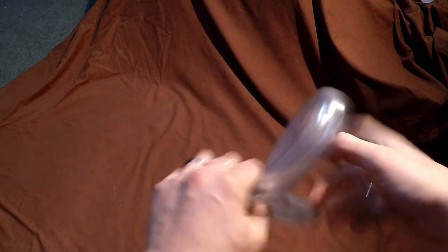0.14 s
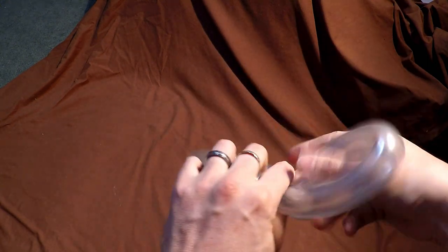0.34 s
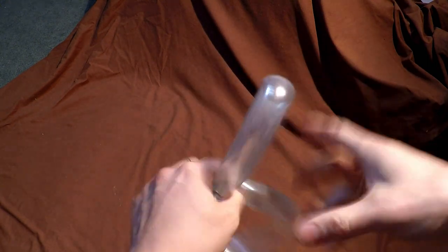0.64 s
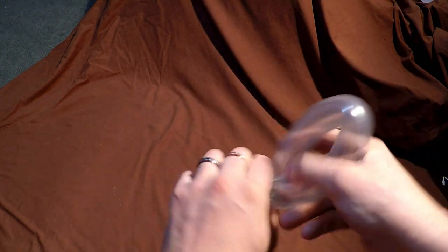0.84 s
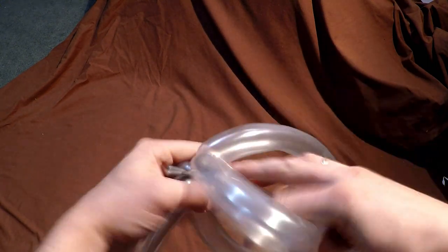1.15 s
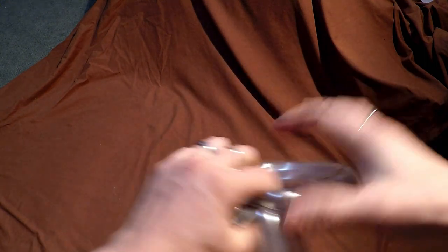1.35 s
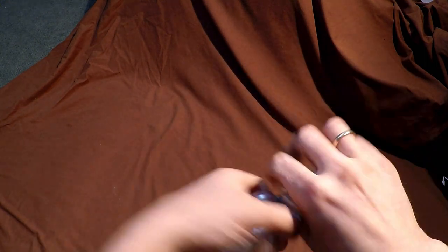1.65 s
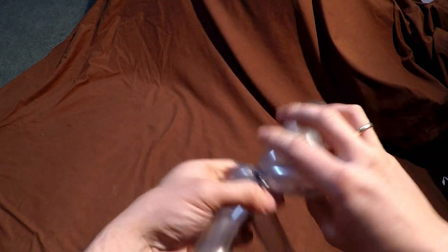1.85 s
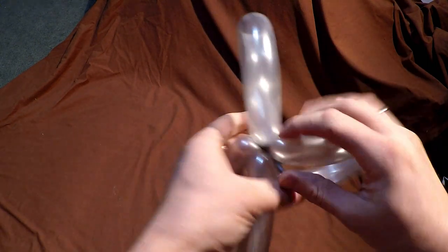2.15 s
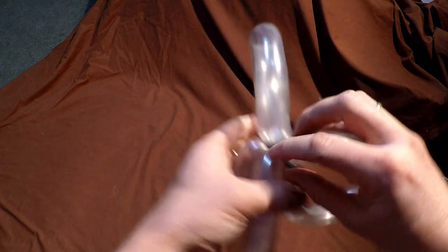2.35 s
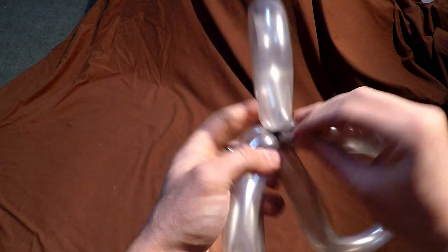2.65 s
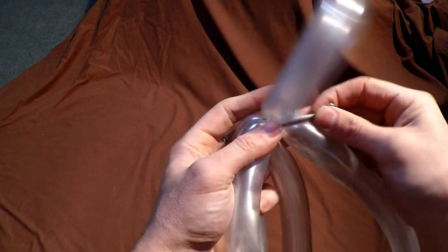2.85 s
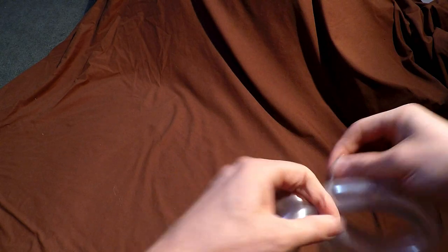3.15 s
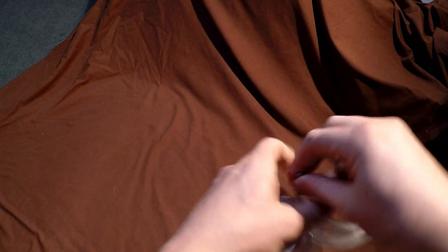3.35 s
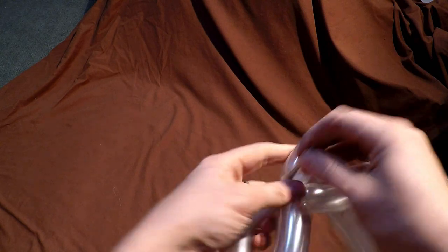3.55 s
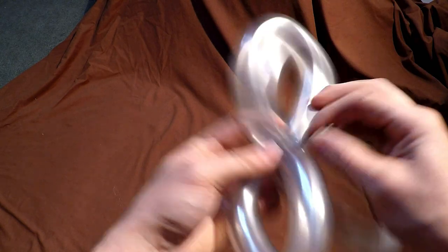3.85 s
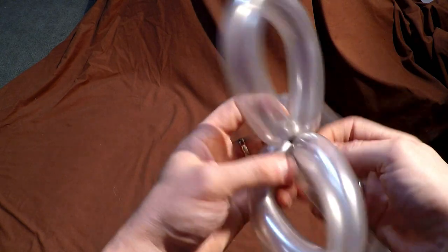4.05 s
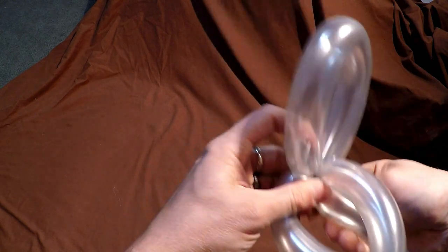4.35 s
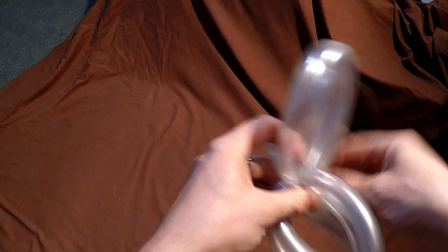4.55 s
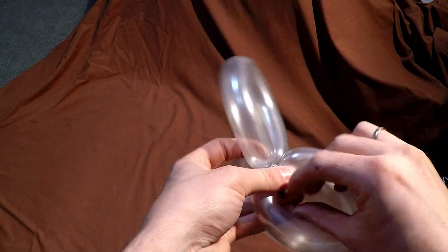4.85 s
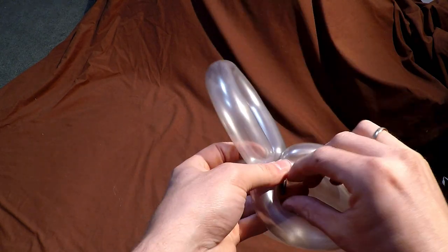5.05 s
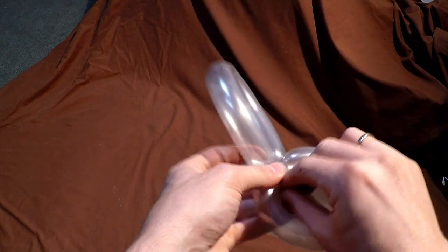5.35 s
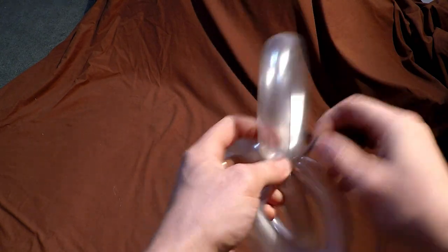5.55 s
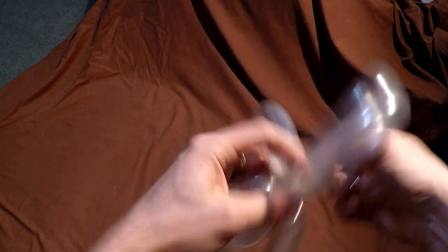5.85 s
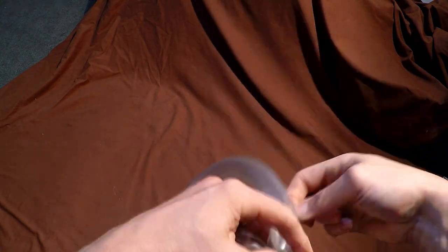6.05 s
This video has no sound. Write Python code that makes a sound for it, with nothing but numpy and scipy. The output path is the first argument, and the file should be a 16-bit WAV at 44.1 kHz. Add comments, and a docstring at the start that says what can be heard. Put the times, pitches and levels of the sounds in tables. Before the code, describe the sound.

Close up in a small room, dry fingertips slide over a long inflated balloon in uneven strokes, now and then knocking softly on the hollow tube. As the twists tighten, latex catches and slips on latex, giving ringing snaps and quick creaking, squeaky runs. These grow denser and peak in a loud crackling creak shortly before the end. A low handling rumble and faint still air lie underneath.

```python
"""A small room, close up: two hands fold and twist an inflated latex modelling balloon.
Fingers rub and crackle over the skin with a low handling rumble, and now and then bump the air-filled tube.
Latex sticks and slips on latex: each slip snaps the taut skin and rings round the tube,
and quick runs of slips creak and squeak. The walls add a short tail over faint still air."""
import sys
import numpy as np
from scipy import signal
from scipy.fft import rfft, irfft, next_fast_len
from scipy.io import wavfile
from scipy.ndimage import map_coordinates

SR = 44100
rng = np.random.default_rng(int(sys.argv[2]) if len(sys.argv) > 2 else 0)


def transcribe(u):
    """Save the signal u as a 16-bit wav file named by the first command-line argument.

    u: samples, shape (n,) or (channels, n), limited to [-1, 1]; the rate is SR.
    q: integer samples, one column per channel.
    """
    v = np.clip(np.atleast_2d(u).T, -1, 1)
    q = np.round(v * 32767).astype(np.int16)
    wavfile.write(sys.argv[1], SR, q)


N = 273665
SLIP_SAMPLES = 2048


def amp(db):
    """Decibels to gain."""
    return 10 ** (np.asarray(db) / 20)


def unit(x):
    """Scale to rms 1."""
    return x / np.sqrt(np.mean(x ** 2) + 1e-20)


def over_time(points):
    """(time_s, value) points, read at every sample."""
    return np.interp(np.arange(N) / SR, *np.transpose(points))


def over_freq(points, hz):
    """(freq_hz, value) points, read on a log axis."""
    freqs_hz, values = np.transpose(points)
    return np.interp(np.log(hz + 1), np.log(freqs_hz), values)


def minimum_phase(gain):
    """Causal response with this magnitude."""
    cepstrum = irfft(np.log(np.maximum(gain, 1e-6)))
    half = len(cepstrum) // 2
    return np.exp(rfft(cepstrum * np.r_[1, np.full(half - 1, 2), 1, np.zeros(half - 1)]))


def coloured(x, spectrum):
    """x through a causal filter of (freq_hz, gain_db) points, rms 1."""
    gain = amp(over_freq(spectrum, np.fft.rfftfreq(8192, 1 / SR)))
    return unit(signal.fftconvolve(x, irfft(minimum_phase(gain)))[:N])


def add(track, start_s, sound):
    """Mix a sound into the track."""
    part = track[..., max(round(start_s * SR), 0):][..., :sound.shape[-1]]
    part += sound[..., :part.shape[-1]]


def friction(slips_per_s, spread_db):
    """Tiny slips of unequal size at random times, rms 1."""
    sizes = amp(spread_db * np.minimum(rng.exponential(size=N), 4))
    signs = rng.choice([-1, 1], N)
    return unit(sizes * signs * (rng.random(N) < slips_per_s / SR))


def surges(fade_s=0.0028, depth=0.52):
    """Gain of a finger that catches and lets go: each release starts at once and dies away."""
    releases = friction(slips_per_s=110, spread_db=2.5) ** 2
    power = signal.lfilter([1], [1, -np.exp(-1 / (fade_s * SR))], releases)
    return np.sqrt(1 - depth + depth * power / power.mean())


# Slow creep of the hands: time_s, level_db
HAND_CREEP = [(0, -43.5), (1, -45), (3, -40.5), (4.5, -41), (6.2, -41)]
# Hands letting go: start_s, end_s, creep_drop_db
HAND_PAUSES = [(0.594, 0.765, 6.5), (1.306, 1.43, 14), (2.57, 2.61, 10), (3.35, 3.395, 5)]
# Finger strokes: start_s, end_s, level_db, relative_hiss_db, patch_hz
FINGER_STROKES = [(0, 0.033, -35, -11.5, 790), (0.13, 0.263, -37, -8, 700), (0.26, 0.435, -39, -11, 1410),
                  (0.501, 0.571, -34.5, -6, 4600), (0.584, 0.616, -41.5, 0, 4650),
                  (.76, 0.85, -61, 9.5, 4320), (0.897, 1.107, -32, -8.5, 1270),
                  (1.1, 1.227, -39.5, -3, 4350), (1.43, 1.471, -30, -13, 696),
                  (1.483, 1.532, -38.5, -7, 2860), (1.52, 1.75, -34, -11.5, 1360),
                  (1.759, 1.852, -33, -14, 1500), (1.852, 2.012, -38, -11.5, 1200),
                  (2.023, 2.254, -39.5, -11, 1520), (2.378, 2.583, -37, -17, 1430),
                  (2.64, 2.722, -32.5, -8, 3360), (2.715, 3.09, -40.5, -5, 2460),
                  (3.077, 3.196, -37.5, -13, 1930), (3.175, 3.235, -31.5, -5, 3200),
                  (3.27, 3.325, -52, 4, 3600), (3.39, 3.495, -34.5, -11, 3250),
                  (3.492, 3.573, -32.5, -10.5, 3400), (3.576, 3.637, -23.5, -16, 2300),
                  (3.73, 3.785, -32, -16, 3100), (3.853, 4.134, -29.5, -17, 1800),
                  (4.151, 4.223, -31, -18, 2420), (4.319, 4.453, -30, -14, 1000),
                  (4.48, 4.587, -38.5, -7, 860), (4.6, 4.728, -56, 6, 2500), (4.75, 4.899, -33, -15, 2400),
                  (4.897, 5.07, -35, -13.5, 900), (5.132, 5.256, -33.5, -17, 864),
                  (5.255, 5.365, -30, -12, 3000), (5.425, 5.575, -41.5, -12, 1000),
                  (5.588, 5.625, -33.5, -6, 4700), (5.679, 5.736, -26, -11, 1640),
                  (5.835, 5.889, -31, -15, 2040), (5.916, 6.045, -36.5, -7, 2900),
                  (6.15, 6.227, -33, -9.5, 2150)]


def sliding(attack_s=0.027, release_s=0.014, swell_db=5, let_go_s=0.028, take_hold_s=0.0047):
    """Rub and hiss gains: each stroke sets in, swells and dies away over the creep of the hands."""
    t = np.arange(N) / SR
    creep_db = over_time(HAND_CREEP)
    for start_s, end_s, drop_db in HAND_PAUSES:
        lifted = np.minimum((t - start_s) / let_go_s, (end_s - t) / take_hold_s)
        creep_db -= drop_db * np.clip(lifted, 0, 1)
    rub_power, hiss_power = amp(creep_db) ** 2, amp(creep_db - 10) ** 2
    for start_s, end_s, level_db, hiss_db, _ in FINGER_STROKES:
        length_s = max(end_s - start_s, attack_s)
        age_s = np.arange(int(length_s * SR) + SR // 4) / SR
        arch = np.sin(np.pi * np.minimum(age_s / length_s, 1)) - 1
        attack = np.minimum(age_s / attack_s, 1)
        release = np.exp(-np.maximum(age_s - length_s, 0) / release_s)
        gain = amp(level_db + swell_db * arch) * attack * release
        add(rub_power, start_s - attack_s / 2, gain ** 2)
        add(hiss_power, start_s - attack_s / 2, (gain * amp(hiss_db)) ** 2)
    return np.sqrt(rub_power), np.sqrt(hiss_power)


def touched_patch(x, boost_db=5, width_octaves=0.8):
    """The skin under the fingers adds a broad resonance that moves from stroke to stroke."""
    start_s, end_s, *_, patch_hz = np.transpose(FINGER_STROKES)
    hz, t, bins = signal.stft(x, SR, nperseg=256)
    centre_hz = np.interp(t, (start_s + end_s) / 2, patch_hz)
    distance = np.log2((hz[:, None] + 1) / centre_hz) / width_octaves
    boost = amp(boost_db * np.exp(-distance ** 2))
    return unit(signal.istft(bins * boost, SR, nperseg=256)[1][:N])


# Rubbed latex: freq_hz, gain_db
SKIN_SPECTRUM = [(400, -37), (700, 0.5), (1200, 0), (1700, 2.5), (2600, 1.5), (4800, 4), (7000, -10.5),
                 (9500, -48), (15000, -120)]
# Dry fingertips: freq_hz, gain_db
HISS_SPECTRUM = [(3240, -6), (5500, -14.5), (7550, -3.5), (13400, -12), (14700, -11.5), (15500, -29)]
# Hollow tube: freq_hz, gain_db
TUBE_SPECTRUM = [(94, -34), (160, -3.5), (300, -4), (421, 2), (575, -0.5), (669, -1.5), (900, -12),
                 (1170, 4.5), (1980, -120)]


def rubbing(rub_gain, hiss_gain, skin_smooth=0.55, hiss_smooth=0.71):
    """The same tiny slips drive skin, hiss and tube; latex catches in grains, fingertips hiss evenly."""
    grains = friction(slips_per_s=520, spread_db=0.5)
    slide = rng.standard_normal(N)
    flutter = surges()
    skin_drive, hiss_drive = [flutter * (np.sqrt(1 - smooth) * grains + np.sqrt(smooth) * slide)
                              for smooth in (skin_smooth, hiss_smooth)]
    skin = amp(-1) * touched_patch(coloured(skin_drive, SKIN_SPECTRUM))
    hiss = amp(-1) * coloured(hiss_drive, HISS_SPECTRUM)
    tube = amp(-8) * coloured(skin_drive, TUBE_SPECTRUM)
    return rub_gain * (skin + tube) + hiss_gain * hiss


# Handling strength: time_s, level_db
RUMBLE_LEVELS = [(0.0, -50), (0.38, -60), (1.66, -51.5), (1.97, -65), (2.19, -56), (2.62, -57),
                 (3.0, -48.5), (3.4, -52), (3.9, -44), (4.02, -42), (4.68, -50), (4.99, -61.5), (5.53, -50),
                 (6.2, -58)]
# Handling noise: freq_hz, gain_db
RUMBLE_SPECTRUM = [(12, -41), (20, -3), (70, 3), (167, -3.5), (200, -28), (260, -39), (440, -120)]


def handling_rumble(gain_db=2, lump_db=2, lumps_per_s=17):
    """Handling the balloon makes a low, lumpy rumble."""
    knots = rng.standard_normal(int(N * lumps_per_s / SR) + 4)
    lumps = map_coordinates(knots, [np.arange(N) * lumps_per_s / SR])
    level_db = over_time(RUMBLE_LEVELS) + gain_db + lump_db * lumps
    return amp(level_db) * coloured(rng.standard_normal(N), RUMBLE_SPECTRUM)


# Room background: freq_hz, gain_db
AIR_SPECTRUM = [(15, -36), (25, 7), (115, -9), (219, -20), (1240, 12.5), (1350, -4), (3010, -18),
                (4150, -9), (15000, -68)]


def still_air(level_db=-60):
    """Faint steady noise of the room."""
    return amp(level_db) * coloured(rng.standard_normal(N), AIR_SPECTRUM)


def slip(noise, note_hz, edge_hz, fizz_db, ring_share, ring_hz):
    """One release of stuck latex. Rows: the snap, and its waves ringing round the tube."""
    t = np.arange(SLIP_SAMPLES) / SR
    hz = np.fft.rfftfreq(SLIP_SAMPLES, 1 / SR) + 1
    ratio = hz / note_hz
    highpass = np.abs(ratio ** 2 / (1 - ratio ** 2 + 1j * ratio / 0.92))
    skin_power = (highpass ** 6 + amp(-21) ** 2) / np.sqrt(np.maximum(ratio, 1))
    skin_power /= 1 + (hz / edge_hz) ** 8
    fizz_power = amp(fizz_db) ** 2 / (1 + (3000 / hz) ** 2) / (1 + (hz / 13000) ** 4)
    # air loads the skin: low waves arrive late
    delay_s = 0.00043 / (1 + ratio ** 2)
    dispersion = np.exp(-2j * np.pi * np.cumsum(delay_s) * SR / SLIP_SAMPLES)
    response = minimum_phase(np.sqrt(skin_power + fizz_power)) * dispersion
    echoes = noise * amp(-60 * t / 0.0082) * (t > 0.0003)
    scatter = unit(irfft(response * rfft(echoes)))
    # one resonance of the squeezed bubble stands out; a loose grip lets it last
    share = np.clip(ring_share, 0.05, 1)
    fade = amp(-60 * t / (share * 0.036)) * (1 - np.exp(-t / 0.00047))
    tone = unit(np.sin(2 * np.pi * (ring_hz * t + noise[0])) * fade)
    snap = np.sqrt(1 - share) * unit(irfft(response))
    ring = np.sqrt(share) * unit(scatter + amp(-1) * tone)
    return np.array([snap, ring]) * np.sqrt(0.004 * SR / SLIP_SAMPLES)  # energy of 4 ms at rms 1


# Faint slips, denser as the twists tighten: time_s, slips_per_s
TICK_DENSITY = [(0, 10), (2.2, 12), (2.6, 25.2), (4.9, 28), (6.2, 13.2)]


def ticks(rub_gain, above_rub_db=2, spread_db=2.5, pitch_spread=0.337):
    """Faint slips fall at random, their strength following the rubbing."""
    track = np.zeros((2, N))
    for i in np.flatnonzero(rng.random(N) < over_time(TICK_DENSITY) / SR):
        noise = rng.standard_normal(SLIP_SAMPLES)
        note_hz, ring_hz = np.exp(pitch_spread * noise[-2:]) * [850, 2200]
        gain = rub_gain[i] * amp(above_rub_db + spread_db * np.tanh(noise[-3]))
        tick = slip(noise, note_hz, edge_hz=5600, fizz_db=-22, ring_share=0.38, ring_hz=ring_hz)
        add(track, i / SR, gain * tick)
    return track


# Soft knocks on the tube: start_s, peak_db, pitch_hz, decay_s
TUBE_BUMPS = [(.143, -23, 372, 0.027), (.182, -20, 420, 0.061), (.19, -28, 110, 0.071),
              (.525, -30.5, 110, 0.044), (.622, -37, 64.6, 0.093), (0.754, -23.5, 435, 0.026),
              (.762, -31.5, 241, 0.14), (1.212, -29, 170, 0.025), (1.233, -31.5, 90, .058),
              (1.4121, -23.5, 270, 0.038), (1.429, -22, 760, 0.018), (1.438, -28, 70, 0.039),
              (1.454, -17, 193, 0.033), (1.789, -24, 508, .14), (2.079, -34, 108, 0.16),
              (2.419, -28, 189, 0.1), (2.96, -30, 170, .1), (3.041, -13.5, 90, 0.025),
              (3.046, -15.5, 340, 0.043), (3.049, -26, 55, 0.058), (3.392, -18, 510, 0.051),
              (3.873, -22, 102, 0.088), (4.525, -23, 720, 0.019), (4.677, -28, 109, .051),
              (5.859, -32, 109, 0.066), (5.996, -20, 323, 0.012), (6.012, -20, 42, 0.042)]


def bumps(rise_s=0.00035, flutter_db=-6, swing_damping=1.46, flutter_damping=0.59):
    """A finger pushes the tube: a low swing that dies away quickly and a hollow flutter around the same pitch
    that lingers longer."""
    track, t = np.zeros(N), np.arange(SR // 4) / SR
    hz = np.fft.rfftfreq(len(t), 1 / SR)
    for start_s, peak_db, pitch_hz, decay_s in TUBE_BUMPS:
        ratio = hz / pitch_hz
        band = rfft(rng.standard_normal(len(t))) * ratio / (1 + ratio ** 3)
        fall_db = -60 * t / decay_s
        flutter = unit(irfft(band, len(t))) * amp(flutter_db + flutter_damping * fall_db)
        swing = np.sin(2 * np.pi * pitch_hz * t) * amp(swing_damping * fall_db)
        knock = (swing + flutter) * (1 - np.exp(-t / rise_s))
        add(track, start_s, amp(peak_db) * knock / np.abs(knock).max())
    return track


# Quick runs of slips: start_s, end_s, slips_per_s, level_db, note_hz, edge_hz, ring_share
CREAK_RUNS = [(0.261, 0.428, 105, -36, 1240, 1850, 0.46), (1.224, 1.304, 57, -43, 2750, 4700, .05),
              (2.777, 2.857, 99, -38, 900, 6100, 0.06), (3.5725, 3.589, 390, -24.5, 1140, 4630, 0.33),
              (3.589, 3.616, 550, -24, 1430, 4900, 0.04), (4.79, 4.91, 110, -33.5, 740, 6640, 0.25),
              (4.9034, 4.982, 54, -30.5, 630, 6800, 0.1), (5.009, 5.07, 167, -29.5, 656, 6600, 0.44),
              (5.091, 5.146, 132, -37.5, 780, 6160, 0.44), (5.151, 5.25, 110, -33, 700, 6200, .3),
              (5.456, 5.465, 350, -35.5, 710, 1050, 1), (5.512, 5.537, 760, -35, 1520, 4440, 0),
              (5.528, 5.554, 710, -37, 626, 4000, 0.17), (5.554, 5.57, 860, -40, 1390, 3600, 0.5),
              (5.849, 5.87, 235, -30, 1200, 5200, 0.1), (5.912, 5.921, 390, -33, 1520, 2340, 1),
              (6.176, 6.196, 290, -32.5, 1170, 4330, 0.3)]


def creaks(spread_db=1.5, fizz_db=-33, jitter=0.16):
    """Under steady pull the latex catches and lets go over and over; the fastest runs squeak."""
    track = np.zeros((2, N))
    for start_s, end_s, slips_per_s, level_db, note_hz, edge_hz, ring_share in CREAK_RUNS:
        waits, sizes = rng.standard_normal((2, 48))
        # one contact spot: all slips of a run ring alike
        noise = rng.standard_normal(SLIP_SAMPLES)
        snap = slip(noise, note_hz, edge_hz, fizz_db, ring_share, ring_hz=1.2 * note_hz)
        time_s = start_s
        for wait, size in zip(waits, sizes):
            if time_s < end_s:
                add(track, time_s, amp(level_db + spread_db * size) * snap)
            time_s += np.exp(jitter * wait) / slips_per_s
    return track


# Hold of each twist on the bubble: start_s, note_hz, edge_hz, fizz_db, ring_share, ring_hz
TWIST_GRIPS = [(0, 850, 5500, -27, .5, 1200), (3.0, 625, 4170, -18, 0.5, 1750),
               (3.07, 960, 4180, -23, 0.6, 1760), (3.17, 1100, 6260, -44, 0.23, 980),
               (3.25, 834, 4360, -22.5, 0.66, 1240), (3.65, 900, 6760, -11, 0.43, 2350),
               (3.9, 2150, 4300, -15.5, 0.55, 2250), (4.074, 970, 5540, -40, 0.32, 2320),
               (4.12, 930, 6850, -19, .45, 2350), (4.5, 730, 4400, -22, 0.57, 980),
               (4.7, 1270, 5500, -29, 0.26, 2420), (5.25, 1740, 5100, -26, 0.32, 1840),
               (5.6, 1070, 4320, -28, 0.6, 2850), (5.9, 1200, 4630, -23, .35, 2300)]
# Loud single slips: start_s, level_db
NECK_SLIPS = [(1.015, -27.5), (1.349, -44.5), (1.412, -40.5), (1.6752, -39), (2.4216, -23.5),
              (2.432, -22.5), (2.4347, -21.5), (2.641, -28.5), (2.697, -27.5), (2.7027, -26),
              (3.0401, -28.5), (3.0481, -18), (3.0905, -19), (3.152, -24), (3.1797, -16), (3.317, -34.5),
              (3.351, -26), (3.3911, -19.5), (3.3938, -12.5), (3.5515, -23.5), (3.6776, -25), (3.7334, -30),
              (3.781, -34), (3.8472, -24), (3.87, -25), (3.9123, -34), (3.9305, -17.5), (3.945, -18.5),
              (3.954, -34), (3.9704, -32), (3.978, -21.5), (3.9849, -18.5), (3.9916, -23), (4.012, -28),
              (4.027, -22), (4.0344, -18.5), (4.04, -21), (4.0477, -23), (4.0547, -20), (4.0631, -22.5),
              (4.07, -24), (4.0766, -19), (4.08, -23), (4.0843, -19), (4.1453, -32), (4.162, -33),
              (4.192, -29), (4.3309, -23), (4.355, -19.5), (4.3758, -17.5), (4.3906, -17.5), (4.4005, -25),
              (4.41, -26), (4.4322, -21.5), (4.5249, -19), (4.5286, -17.5), (4.7714, -30.5), (4.8136, -26),
              (4.8232, -22), (5.1723, -22.5), (5.1947, -18.5), (5.2564, -11), (5.265, -11), (5.2736, -12.5),
              (5.2829, -10.5), (5.2854, -16), (5.292, -18), (5.2948, -11), (5.2987, -15), (5.3012, -14.5),
              (5.3048, -18), (5.3111, -14), (5.3136, -17), (5.3162, -15), (5.3211, -14), (5.3401, -14),
              (5.6727, -26), (5.6934, -18), (5.697, -21.5), (5.7047, -19), (5.7065, -20), (5.7094, -23),
              (5.7165, -14.5), (5.949, -23.5), (5.9585, -23)]


def neck_snaps(spread_db=0.5, note_spread=0.041, alike=0.766):
    """Twisted necks let go in single snaps; those of one grip share a spot and ring much alike."""
    track, grips = np.zeros((2, N)), np.array(TWIST_GRIPS)
    spot_noises = rng.standard_normal((len(grips), SLIP_SAMPLES))
    slip_noises = rng.standard_normal((len(NECK_SLIPS), SLIP_SAMPLES))
    for (start_s, level_db), own_noise in zip(NECK_SLIPS, slip_noises):
        grip = max(np.searchsorted(grips[:, 0], start_s) - 1, 0)
        _, note_hz, *timbre = grips[grip]
        noise = np.sqrt(alike) * spot_noises[grip] + np.sqrt(1 - alike) * own_noise
        snap = slip(noise, note_hz * np.exp(note_spread * own_noise[-1]), *timbre)
        add(track, start_s, amp(level_db + spread_db * own_noise[-2]) * snap)
    return track


# Wall reverberation: freq_hz, t60_s
ROOM_DECAY = [(100, 0.054), (600, 0.22), (2500, 0.12), (6000, 0.036), (15000, 0.37)]


def room(x, gap_s=0.0037):
    """The walls answer with a short, diffuse tail."""
    hz, t, bins = signal.stft(rng.standard_normal(SR // 2), SR, nperseg=256)
    decay = amp(-60 * t / over_freq(ROOM_DECAY, hz)[:, None])
    tail = signal.istft(bins * decay, SR, nperseg=256)[1]
    tail *= np.arange(len(tail)) / SR > gap_s
    return signal.fftconvolve(x, tail / np.linalg.norm(tail))[:N]


def scene(room_db=-10):
    """Snaps beam straight at the microphone; the ringing tube and the hands also fill the room."""
    rub_gain, hiss_gain = sliding()
    hands = rubbing(rub_gain, hiss_gain) + handling_rumble() + bumps()
    air = still_air()
    snaps, rings = neck_snaps() + creaks() + ticks(rub_gain)
    body = rings + hands
    return (snaps + body + amp(room_db) * room(body) + air)[None]


def record(dry, ceiling=1.05, top_hz=15500):
    """Soft limiter on the hardest snaps, then a steep low-pass."""
    limited = dry[0] / (1 + np.abs(dry[0] / ceiling) ** 6) ** (1 / 6)
    size = next_fast_len(N + SR // 2)
    lowpass = 1 / np.sqrt(1 + (np.fft.rfftfreq(size, 1 / SR) / top_hz) ** 220)
    return irfft(rfft(limited, size) * lowpass, size)[None, :N]


dry = scene()
out = record(dry)
transcribe(out)
```